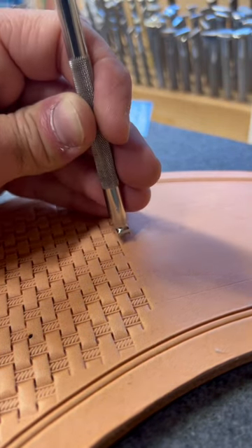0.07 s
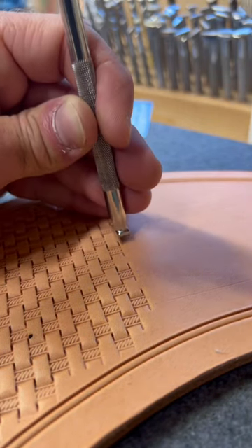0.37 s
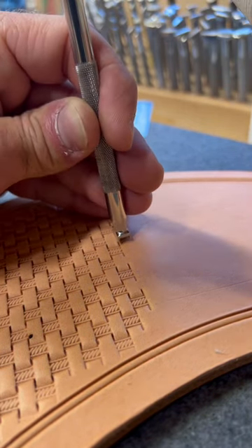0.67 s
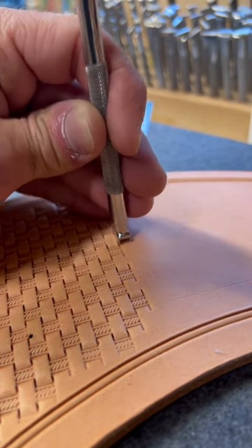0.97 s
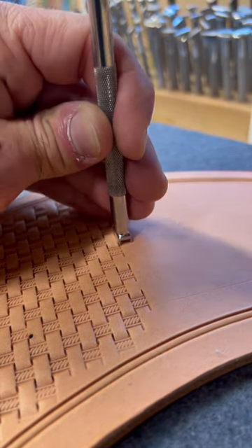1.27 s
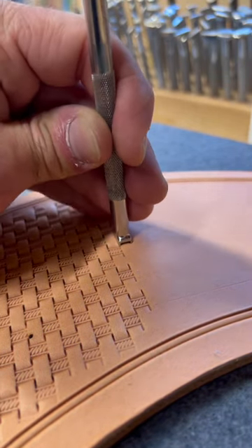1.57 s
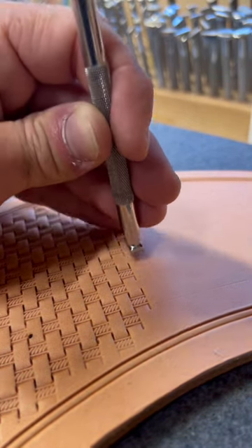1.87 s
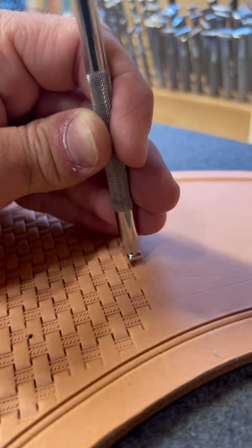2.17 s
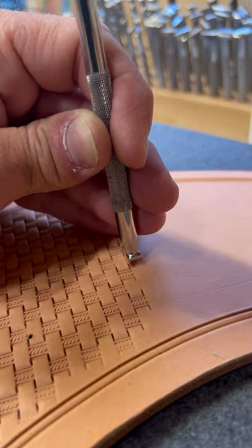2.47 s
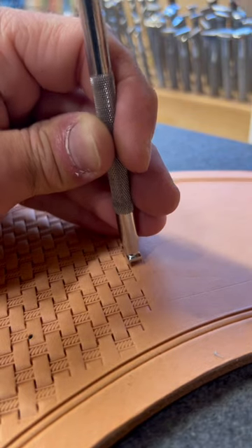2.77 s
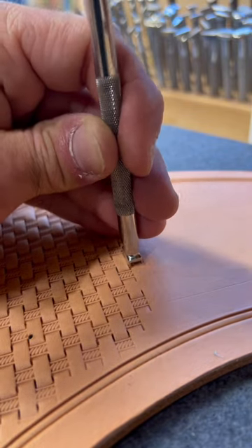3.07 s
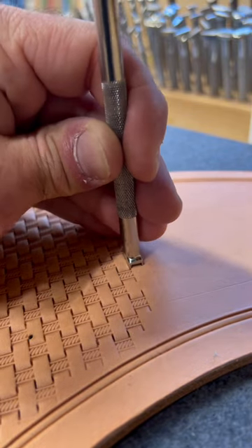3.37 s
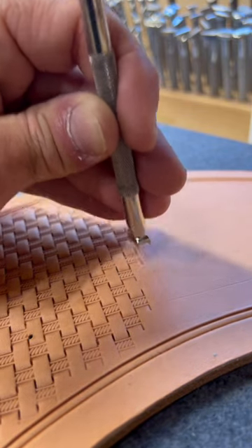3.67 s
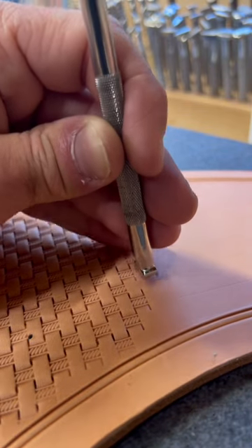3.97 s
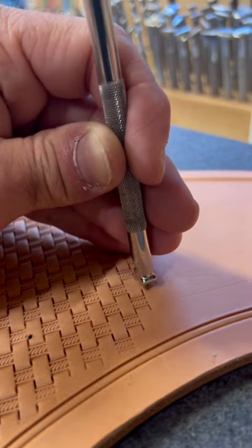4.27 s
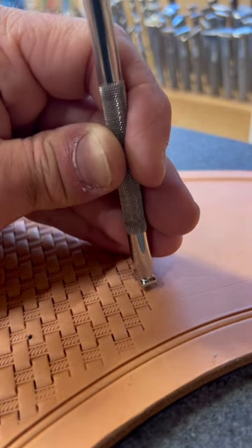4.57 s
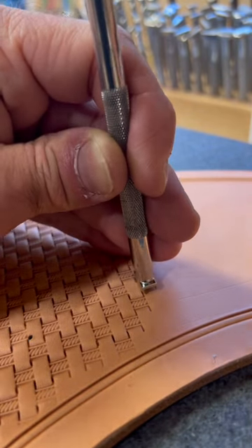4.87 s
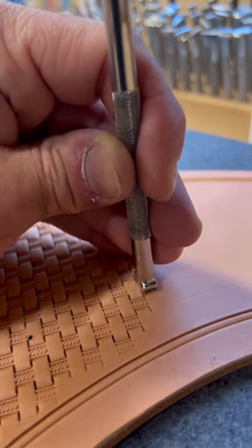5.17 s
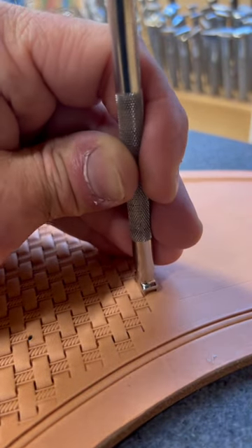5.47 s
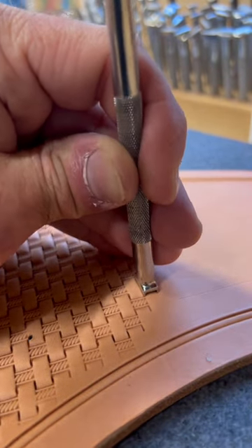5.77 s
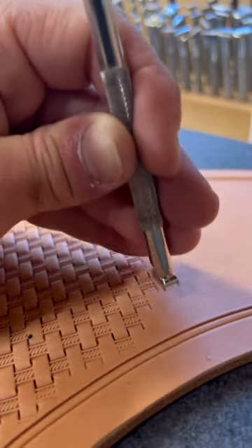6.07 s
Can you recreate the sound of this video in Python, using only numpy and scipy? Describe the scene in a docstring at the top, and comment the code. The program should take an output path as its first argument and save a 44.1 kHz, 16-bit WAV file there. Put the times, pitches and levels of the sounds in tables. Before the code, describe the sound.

Heard close up at a workbench, a hand shifts softly and a metal stamp ticks on leather. A mallet gives a light tap followed quickly by a hard, cracking knock that thumps the bench and rattles nearby tools. The tap and blow repeat twice more, with faint ticks and crackles between, before the hand shifts again. The small room adds a short reverberation and a low, steady hum.

```python
"""Leather tooling at a workbench, heard from close by. Over a low room hum a hand shifts, and a steel stamp
ticks and faintly crackles on the leather. A mallet taps the stamp to seat it, then drives it home: each
impact excites a crack in the stamp, a knock in the mallet head and a thump in bench and room. After the
hard blow, jolted tools ring, jingle and rock to rest while the small room reverberates. Tap and blow come
three times, with light contacts between; at the end the hand shifts again."""
import sys
import numpy as np
from scipy import signal
from scipy.fft import rfft, irfft, next_fast_len
from scipy.io import wavfile
from scipy.ndimage import uniform_filter1d

SR = 44100
rng = np.random.default_rng(int(sys.argv[2]) if len(sys.argv) > 2 else 0)


def generate_wav(signal):
    """Clip the signal to [-1, 1] and save it as 16-bit WAV at the path in sys.argv[1]."""
    frames = np.transpose(np.atleast_2d(signal))
    scaled = np.clip(frames, -1, 1) * 32767
    pcm = np.round(scaled).astype(np.int16)
    wavfile.write(sys.argv[1], SR, pcm)


N = 278712
TIME = np.arange(N) / SR
AGE = np.arange(SR) / SR  # seconds since an onset

# Spectra of the room's rumble and ventilation. Each row: frequency in Hz, relative level in dB.
RUMBLE_COLOUR = [(20, -15.5), (45, -1.5), (76, 1.5), (115, -10.5), (200, -30), (500, -69)]
VENT_COLOUR = [(60, -21.5), (130, -6.5), (235, -2), (370, -5.5), (760, -20.5), (1100, -25.5), (2100, -32),
               (4300, -45), (6700, -43.5), (9800, -51), (13000, -49.5), (16000, -54)]
# Steady hum tones. Each row: frequency in Hz, level in dB.
HUM_TONES = [(238, -70), (298, -71.5), (370, -68)]
# Stereo coherence of the background and of bench sounds. Each row: frequency in Hz, left-right correlation.
AMBIENT_COHERENCE = [(100, 1), (400, 0.74), (1500, 0.41), (6000, 0.72)]
ROOM_COHERENCE = [(100, 0.99), (300, 1), (700, 0.46), (1400, 1), (3500, 1), (6000, 0.4), (9000, 1)]
# Hand shifts on the bench and clusters of tiny contacts on the leather.
# Each row: centre in seconds, half length in seconds, level in dB.
HAND_SHIFTS = [(.05, .11, -37.5), (5.895, .05, -31.5), (6.08, .1, -41)]
CONTACT_CLUSTERS = [(.855, 0.02, -69), (1.1, .06, -75), (1.8, .025, -73.5), (1.95, .03, -79),
                    (2.75, 0.02, -66.5), (3.7, 0.034, -67), (3.89, 0.071, -73.5), (4.46, .015, -71.5),
                    (4.79, 0.018, -71), (4.99, .035, -66.5), (5.13, .025, -70), (5.82, 0.0814, -65.5),
                    (6.035, 0.057, -59), (6.29, 0.093, -71)]
# Stamp and fingernails touching the leather.
# Each row: start in seconds, relative levels of tip and body in dB.
LEATHER_TICKS = [(0.4626, -51, -65), (0.562, -74, -53), (0.676, -55, -60.5), (1.121, -48, -68),
                 (1.132, -51, -60), (1.144, -47, -56), (2.8798, -49, -63.5), (3.1121, -41, -50),
                 (3.132, -45, -55), (3.2005, -41, -52.5), (3.305, -49, -66), (3.9613, -41.5, -68.5),
                 (4.871, -52.5, -55.5), (4.9675, -39.5, -52.5), (5.3585, -41.5, -50.5), (5.454, -43, -48.5),
                 (5.4978, -49, -54), (6.1614, -61.5, -51)]
# Spectra of these light contacts. Each row: frequency in Hz, relative level in dB.
HAND_COLOUR = [(18, -46), (30, -57), (75, 9.5), (135, -5.5), (171, 0.5), (214, -14.5), (335, -18.5),
               (545, -41), (700, -43), (910, -67), (1540, -120)]
CLUSTER_COLOUR = [(500, -18), (1200, 12), (2000, 9), (3500, 2.5), (5500, 2.5), (7500, 7), (9500, 1),
                  (11500, 8), (15500, 7)]
TICK_TIP_COLOUR = [(1000, -13), (3000, -10), (6000, 0), (9000, 0), (12000, 3), (16000, 1)]
TICK_BODY_COLOUR = [(400, -16), (1000, 10.5), (2100, 2.5), (4000, -7.5), (9000, -12)]
# A loose tool rocking after each hard blow. Each row: start in seconds, first gap in seconds,
# number of clacks, relative level of the loudest in dB, first pitch in Hz.
ROCKING_RUNS = [(1.516, .0446, 6, -32, 1150), (3.464, .0455, 2, -38.5, 920), (5.594, .0455, 6, -30, 950)]
# Spectra of a clack pitched at 1 kHz and of landing tools. Each row: frequency in Hz, relative level in dB.
CLACK_COLOUR = [(450, -25), (780, -2), (1000, 0), (1220, -4), (1600, -30), (2400, -42), (3000, -20),
                (3800, -46), (12000, -65)]
LANDING_COLOUR = [(2000, -24.5), (5000, -12.5), (6700, -2.5), (7800, 2.5), (9500, -12), (13000, -9.5),
                  (16000, -12.5)]
# Modes of the standing steel tools. Each row: frequency in Hz, relative level in dB.
TOOL_MODES = [(2202, 0), (2272, -3), (2358, 0), (2422, -1), (2630, -1.5), (2945, -7), (3138, 2), (3424, 0),
              (3623, -1), (5152, -6), (5329, -3), (6412, -8), (7467, -5), (7612, -3), (8156, -5),
              (8845, -4), (9150, 2), (10900, -3)]
# Spectrum of the reverberation. Each row: frequency in Hz, relative level in dB.
REVERB_COLOUR = [(30, -4), (75, 4), (130, -1), (300, 9), (500, 1), (900, 0), (1200, -8), (1500, -12.5),
                 (2000, -14.5), (2450, -11), (2850, -18.5), (3500, -14), (4400, -24.5), (8000, -28.5),
                 (15000, -37)]
# Reverberation time. Each row: frequency in Hz, time to fall 60 dB (t60) in seconds.
REVERB_T60 = [(60, 1), (300, 0.74), (1000, 0.27), (1800, .36), (3300, 0.48), (8000, 0.42), (15000, 0.6)]
# Low modes of bench and room, and modes of the mallet head.
# Each row: frequency in Hz, relative level in dB, t60 in seconds.
BENCH_ROOM_MODES = [(51.3, -21, 0.32), (91, -11, 0.125), (186, -5, 0.078), (203, -14.5, .22),
                    (234, -22.5, .21), (245, -32, 0.28), (276, -31, 0.2), (301, -26, .36),
                    (322, -22.5, 0.32), (370.5, -25, 0.36), (447, -32, 0.3), (432, -1.5, 0.015),
                    (579, -36, 0.3), (630, -2.5, 0.015), (784, -33, 0.07), (796, -39, 0.49)]
HEAD_MODES = [(680, -3, .022), (800, -7.5, .085), (940, -2, .02), (1025, -10.5, .065), (1270, -.5, .022),
              (1420, -4.5, .017), (1750, -5, .018), (2230, -2.5, .02)]
# Spectra of a blow's first scuff and of its crack's grit. Each row: frequency in Hz, relative level in dB.
SCUFF_COLOUR = [(100, -3), (400, 3), (1000, -4), (2500, -7), (6000, -17), (9000, -31), (15000, -50)]
CRACK_COLOUR = [(300, -25), (900, -2), (3500, -2), (4500, -3.5), (9500, -5.5), (11500, -11.5),
                (16000, -15.5)]
# Modes of the struck stamp. Each row: frequency in Hz, relative level in dB.
STAMP_MODES = [(1030, -6.5), (1330, -4), (1750, -11), (2290, 2.5), (2550, -6), (3300, -4.5), (3620, -6),
               (4400, -12.5), (5080, -5.5), (6190, -6), (7650, -6.5), (8430, -5.5), (9300, -0.5),
               (11100, -16), (12300, -13), (13500, -19.5), (15400, -18)]
# Mallet blows. Each row: start in seconds, force in dB relative to a full blow,
# gain of the knock in dB, extra gain of the crack in dB.
MALLET_BLOWS = [(1.1666, -6.7, -23.5, 0), (1.4576, 0, -20.5, 1), (3.0433, -7.4, -25, -1),
                (3.3706, 0, -19.5, -1.5), (5.2256, -5, -22.5, .5), (5.5372, 0, -17, .5)]


def amp(db):
    """Amplitude grows tenfold for every 20 dB."""
    return 10 ** (np.asarray(db) / 20)


def unit(x):
    """Normalisation to an rms of 1."""
    return x / np.sqrt(np.mean(x ** 2) + 1e-20)


def along(points, hz):
    """Interpolation of (Hz, value) points on a logarithmic frequency axis."""
    knots_hz, values = np.transpose(points)
    return np.interp(np.log(hz + 1), np.log(knots_hz), values)


def filtered(x, response):
    """Linear filtering: the spectrum is multiplied by a frequency response."""
    size = x.shape[-1]
    padded = next_fast_len(size + 8192)
    return irfft(rfft(x, padded) * response(np.fft.rfftfreq(padded, 1 / SR)), padded)[..., :size]


def noise(colour, size, coherence=ROOM_COHERENCE):
    """Coloured stereo noise of rms 1; the balance of mid and side sets its coherence."""
    def shape(hz):
        angle = np.arccos(np.clip(along(coherence, hz), -1, 1)) / 2
        return amp(along(colour, hz)) * [np.cos(angle), np.sin(angle)]
    mid, side = filtered(rng.standard_normal((2, size)), shape)
    return unit(np.array([mid + side, mid - side]))


def wobble(rate_hz, size):
    """Random modulation: straight lines join Gaussian values drawn at the given rate."""
    knots = rng.standard_normal(size // 10)
    return np.interp(np.arange(size) * rate_hz / SR, np.arange(len(knots)), knots)


def add(track, start_s, sound):
    """Superposition: a sound adds to the track from its start time."""
    start = max(round(start_s * SR), 0)
    part = sound[..., :N - start]
    track[:, start:start + part.shape[-1]] += part


def rolloff(hz, cutoff_hz, slope):
    """Low-pass gain: above the cut-off, energy falls as a power of frequency."""
    return 1 / np.sqrt(1 + (hz / cutoff_hz) ** slope)


def dulled(x, cutoff_hz):
    """A soft contact acts as a first-order low-pass filter."""
    pole = np.exp(-2 * np.pi * cutoff_hz / SR)
    return signal.lfilter([1 - pole], [1, -pole], x)


def grainy_swells(rows, colour, grain_db, grain_hz):
    """Many tiny contacts sum to noise of uneven level under Gaussian envelopes."""
    envelope = sum(amp(db) * np.exp(-((TIME - centre) / half) ** 2) for centre, half, db in rows)
    return envelope * unit(amp(grain_db * wobble(grain_hz, N)) * noise(colour, N))


def ambience(rumble_db=-54, fade_db_per_s=1.4, vent_db=-61.8):
    """Background noise: a slowly easing rumble, steady broadband ventilation and faint pure tones."""
    rumble = amp(rumble_db - fade_db_per_s * TIME) * noise(RUMBLE_COLOUR, N, AMBIENT_COHERENCE)
    vent = amp(vent_db) * noise(VENT_COLOUR, N, AMBIENT_COHERENCE)
    hum = sum(amp(db) * np.sin(2 * np.pi * hz * TIME + rng.uniform(0, 2 * np.pi))
              for hz, db in HUM_TONES)
    return rumble + vent + hum


def hand():
    """Forced vibration: the hand's shifting weight draws a dull, lumpy rumble from the bench."""
    return grainy_swells(HAND_SHIFTS, HAND_COLOUR, grain_db=2.5, grain_hz=40)


def contact_clusters():
    """Incoherent summation: clusters of tiny contacts merge into faint, brief swells of grainy hiss."""
    return grainy_swells(CONTACT_CLUSTERS, CLUSTER_COLOUR, grain_db=4, grain_hz=660)


def ticks(tip_t60=0.012, body_t60=0.053, gain_db=-7, stray_count=14):
    """Damped transients: light touches on the leather tick, with fainter contacts at random moments."""
    out, t = np.zeros((2, N)), AGE[:SR // 10]
    strays = [(when * N / SR, -66 + 4 * (2 * size - 1), -76)
              for when, size in rng.random((stray_count, 2))]
    for start, tip_db, body_db in LEATHER_TICKS + strays:
        tip = amp(tip_db - 60 * t / tip_t60) * noise(TICK_TIP_COLOUR, len(t))
        body = amp(body_db - 60 * t / body_t60) * noise(TICK_BODY_COLOUR, len(t))
        add(out, start, amp(gain_db) * (tip + body))
    return out


def jingling(delay_s=.03, jingle_half_s=.022, clink_half_s=.004, mean_gap_s=.05, loss_db=3.5, clinks=4):
    """Secondary impacts: jolted tools land in one jingle, then stragglers clink, ever weaker."""
    swells = []
    gap_factors = rng.uniform(.5, 1.5, (len(MALLET_BLOWS), clinks))
    for (start, force_db, *_), gaps in zip(MALLET_BLOWS, gap_factors):
        landing = start + delay_s
        jingle_db = -45.5 + 4.5 * force_db
        swells.append((landing, jingle_half_s, jingle_db))
        for k, wait in enumerate(mean_gap_s * np.cumsum(gaps)):
            swells.append((landing + wait, clink_half_s, jingle_db - 10 - loss_db * k))
    return grainy_swells(swells, LANDING_COLOUR, grain_db=4, grain_hz=600)


def rocking(t60=0.023, rise_s=0.0016, gain_db=4, gap_ratio=.959, loss_db=3.2, rest_hz=1100, settle=.6):
    """Dissipation: a rocking tool loses energy, so its clacks come sooner, weaken and settle in pitch."""
    out, t = np.zeros((2, N)), AGE[:SR // 4]
    room_linger = amp(-19 - 60 * t / 0.19)
    envelope = (amp(-60 * t / t60) + room_linger) * (1 - np.exp(-t / rise_s))
    for start, gap, count, db, first_hz in ROCKING_RUNS:
        for k in range(round(count)):
            pitch_hz = rest_hz + (first_hz - rest_hz) * settle ** k
            colour = np.array(CLACK_COLOUR) * [pitch_hz / 1000, 1]
            drop_db = 6.5 if k == 0 else loss_db * (k - 1)  # the first contact only glances
            onset = start + gap * np.sum(gap_ratio ** np.arange(k))
            add(out, onset, amp(db - drop_db + gain_db) * envelope * noise(colour, len(t)))
    return out


def room_tail(gain_db=-22, rise_s=0.00083, patchy_db=3):
    """Reverberation: the workshop answers in uneven patches, each frequency decaying at its own rate."""
    hz, t, spectrum = signal.stft(noise(REVERB_COLOUR, SR), SR, nperseg=256)
    speckle = rng.standard_normal(spectrum.shape[1:])
    patches = unit(uniform_filter1d(uniform_filter1d(speckle, 3, axis=0), 5, axis=1))
    # clutter on the bench scatters only the short waves
    scatter_db = patchy_db * patches * (1 - rolloff(hz, 1100, slope=4))[:, None]
    decay_db = 60 * t / along(REVERB_T60, hz)[:, None]
    _, tail = signal.istft(spectrum * amp(scatter_db - decay_db), SR, nperseg=256)
    return amp(gain_db) * tail[:, :SR] * (1 - np.exp(-AGE / rise_s))


def tool_ring(rise_s=0.0046, chatter_db=2.5, chatter_hz=55, waver_rad=.85, vary_db=1.5):
    """Free vibration: jolted tools ring, modulated in level and phase as they chatter in their rack."""
    t = AGE[:SR // 2]
    ring = np.zeros((2, len(t)))
    for hz, db in TOOL_MODES:
        t60 = np.interp(hz, [3500, 7500], [.6, .35])
        phase = 2 * np.pi * hz * t + waver_rad * wobble(chatter_hz, len(t)) + rng.uniform(0, 2 * np.pi)
        stereo_phase = rng.normal(0, .4, (2, 1))
        mode_db = db + rng.normal(0, vary_db) + chatter_db * wobble(chatter_hz, len(t))
        ring += amp(mode_db - 60 * t / t60) * np.sin(phase + stereo_phase)
    return ring * (1 - np.exp(-t / rise_s))


def low_thump(cutoff_hz, delay_s, lean_db=0.56, stereo_lag_s=.00005):
    """Resonance: the push excites low modes of bench and room, a thump with a lingering boom."""
    side = np.array([[1], [-1]])
    t = np.maximum(AGE[:SR // 2] - delay_s + side * stereo_lag_s, 0)
    thump = np.zeros_like(t)
    for k, (hz, db, t60) in enumerate(BENCH_ROOM_MODES):
        sign = (-1) ** k
        side_db = sign * side * lean_db * (hz > 190)  # higher modes are a little louder on one side
        envelope = rolloff(hz, cutoff_hz, slope=5.5) * amp(db + side_db - 60 * t / t60)
        thump += sign * envelope * np.sin(2 * np.pi * hz * t)
    return thump


def leather_scuff(lead_s, rise_s=.0006, t60=.06):
    """Compression: the stamp scuffs into the slack leather, fading out once it is pressed tight."""
    t = AGE[:SR // 50]
    press = (1 - np.exp(-t / rise_s)) * amp(-60 * t / t60) * np.clip(2 - t / lead_s, 0, 1)
    return press * noise(SCUFF_COLOUR, len(t))


def head_knock(rise_s=0.00076):
    """Heavily damped modes give the mallet head a short, hollow knock."""
    t = AGE[:SR // 10]
    ring = np.zeros((2, len(t)))
    for k, (hz, db, t60) in enumerate(HEAD_MODES):
        stereo_phase = rng.normal(0, 0.38, (2, 1))
        ring += (-1) ** k * amp(db - 60 * t / t60) * np.sin(2 * np.pi * hz * t + stereo_phase)
    return ring * (1 - np.exp(-t / rise_s))


def stamp_crack(contact_s=.0029, grit_db=-10, scatter_db=-22, scatter_t60=0.09, skew_rad=0.26):
    """Contact damping: the stamp's modes ring while the mallet presses, then the leather chokes them."""
    t = AGE[:SR // 10]
    hz, db = np.transpose(STAMP_MODES)[:, :, None]
    phase = 2 * np.pi * hz * t + rng.uniform(0, 2 * np.pi, hz.shape)
    # the lower modes arrive slightly out of step on the left and right
    skew = skew_rad * rng.choice([-1, 1], hz.shape) * rolloff(hz, 6700, slope=5.3)
    gain = amp(db + rng.normal(0, 1, hz.shape))
    ring = unit(np.array([np.sum(gain * np.sin(phase + side * skew), 0) for side in (1, -1)]))
    grit = noise(CRACK_COLOUR, len(t))
    press = (1 - np.exp(-t / .0002)) * np.exp(-(t / contact_s) ** 6)
    scatter = amp(scatter_db - 60 * t / scatter_t60) * grit  # off the bench top and the hand
    return press * (ring + amp(grit_db) * grit) + scatter


def mallet(bright_hz=12000, soft_thump_hz=220, hard_thump_hz=1500, lead_s=.0075):
    """Impact excitation: a harder blow is a shorter contact, brighter and sooner to reach the bench."""
    out = np.zeros((2, N))
    for start, force_db, knock_db, crack_db in MALLET_BLOWS:
        force = amp(force_db)  # 1 for a full blow; each part but the knock grows as a power of it
        cutoff_hz = bright_hz * force ** 1.9
        thump_hz = soft_thump_hz + (hard_thump_hz - soft_thump_hz) * force ** 6.5
        push_delay_s = .0026 - .00019 * force_db
        scuff = amp(-29) * force ** 2.4 * dulled(leather_scuff(lead_s), cutoff_hz)
        crack = amp(crack_db - 10.2) * force ** 2.3 * dulled(stamp_crack(), cutoff_hz)
        knock = amp(knock_db) * head_knock()
        thump = force ** .95 * low_thump(thump_hz, push_delay_s)
        tools = amp(-55) * force ** 3.7 * dulled(tool_ring(), cutoff_hz)
        room = amp(-6.3) * force ** 3.15 * dulled(room_tail(), cutoff_hz)
        add(out, start - lead_s, scuff)
        for part in (crack, knock, thump, tools, room):
            add(out, start, part)
    return out


def scene():
    """Superposition: the pressures of all sources at the bench add."""
    return contact_clusters() + mallet() + rocking() + jingling() + ticks() + hand() + ambience()


def record(dry, ceiling=0.9, top_hz=16300, edge_hz=600):
    """Soft saturation rounds the highest peaks; a band limit removes the extreme treble."""
    rounded = dry / (1 + np.abs(dry / ceiling) ** 6) ** (1 / 6)
    return filtered(rounded, lambda hz: np.clip((top_hz - hz) / edge_hz + .5, 0, 1))


dry = scene()
out = record(dry)
generate_wav(out)
```